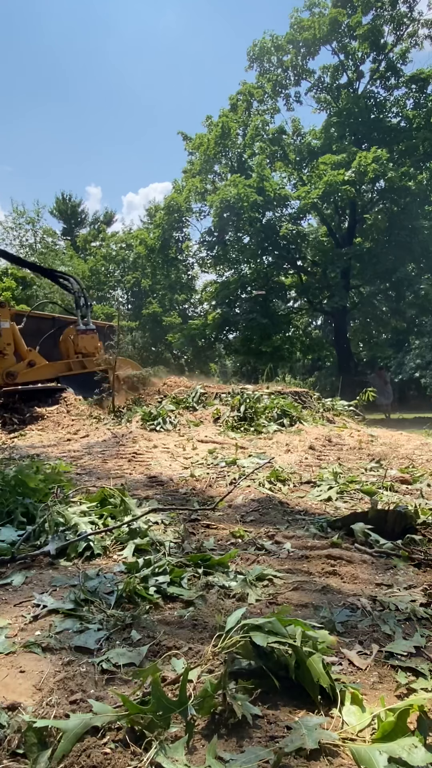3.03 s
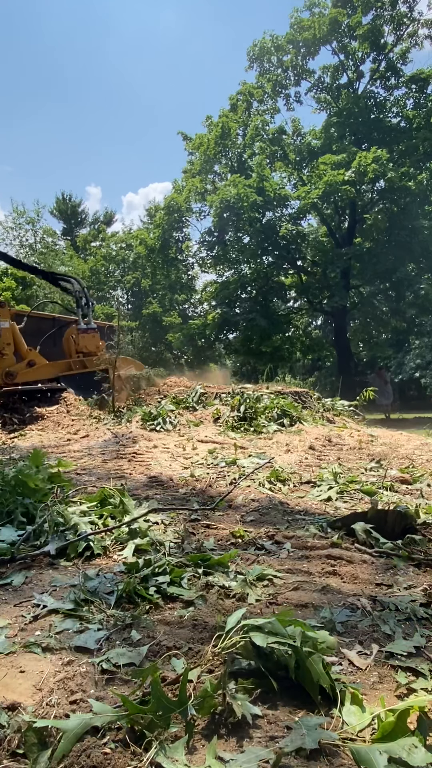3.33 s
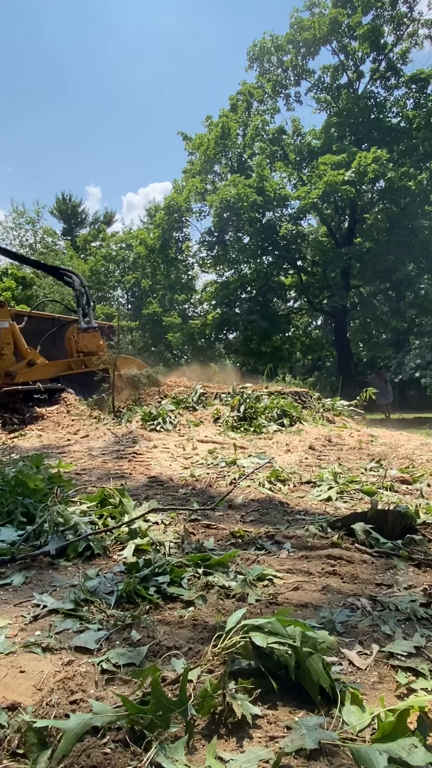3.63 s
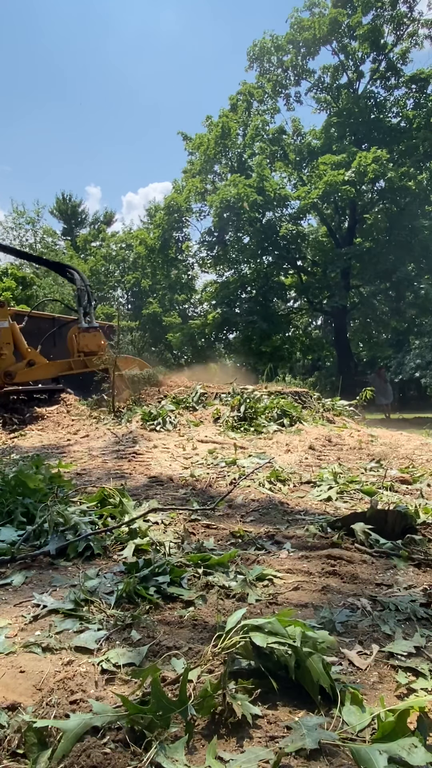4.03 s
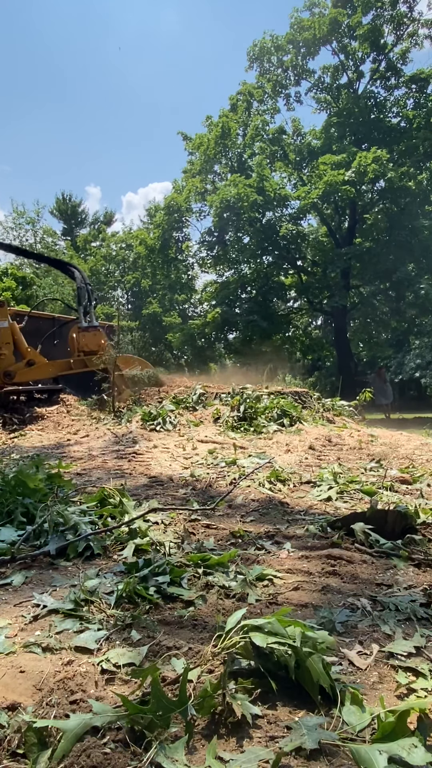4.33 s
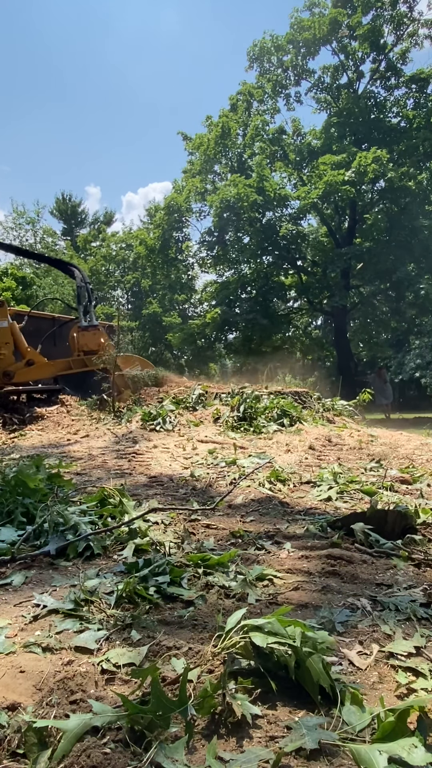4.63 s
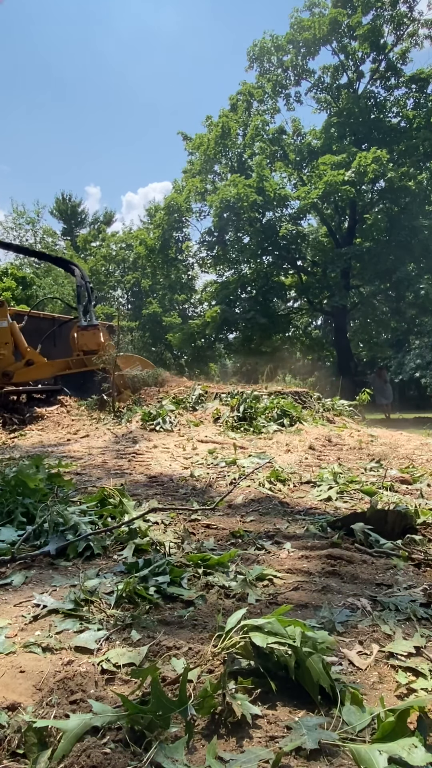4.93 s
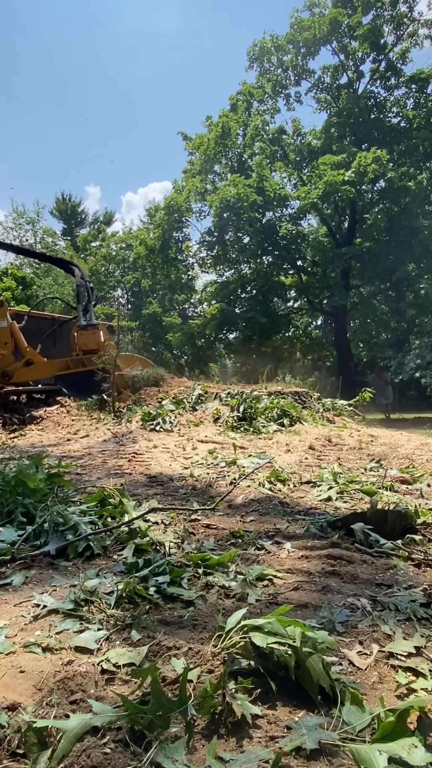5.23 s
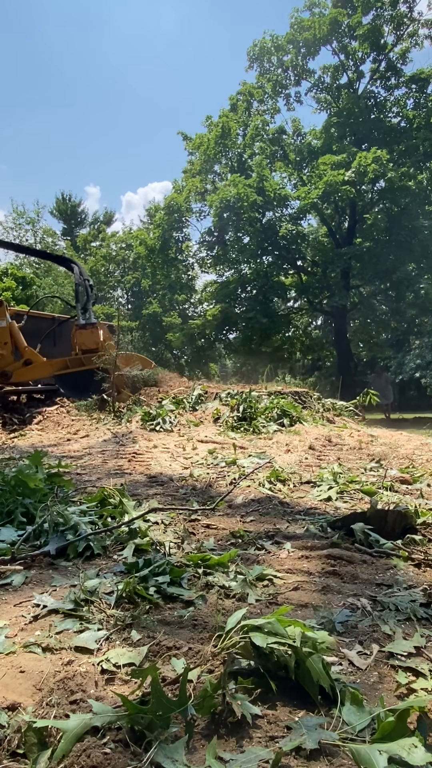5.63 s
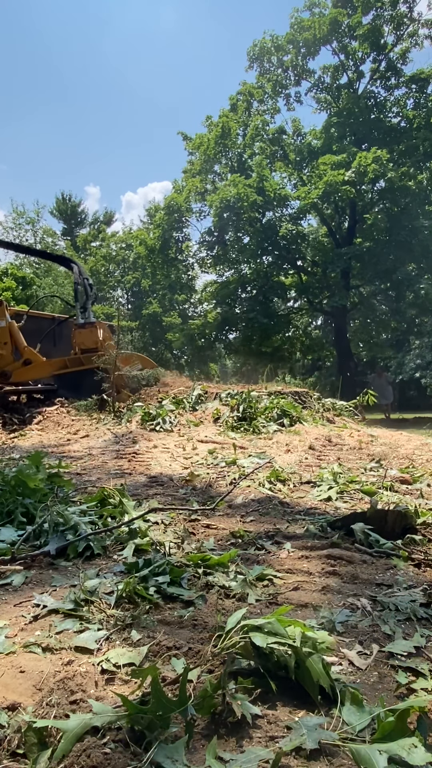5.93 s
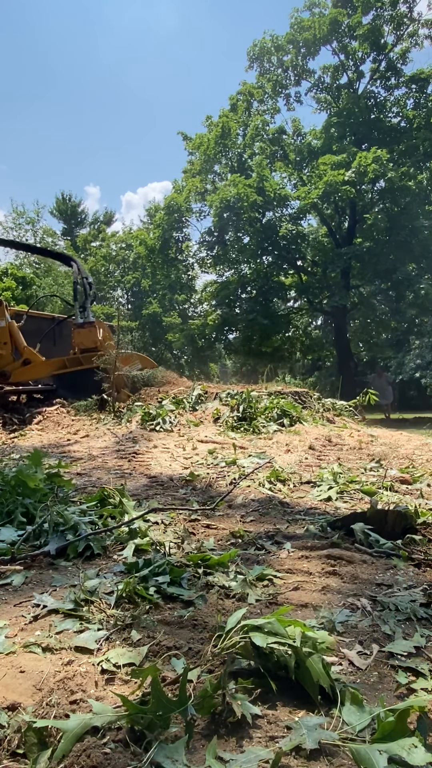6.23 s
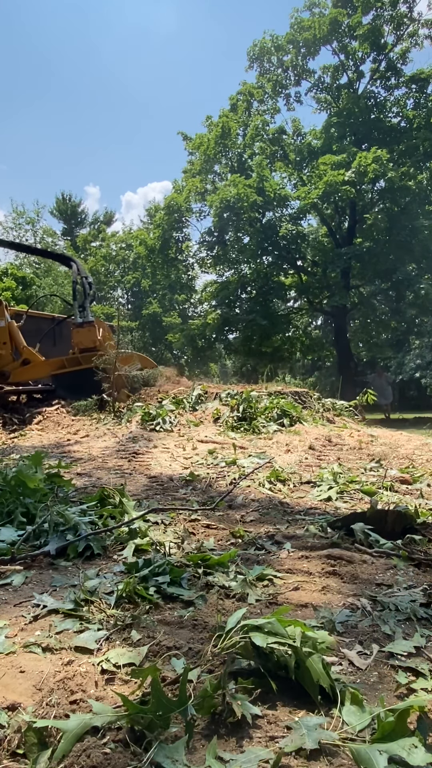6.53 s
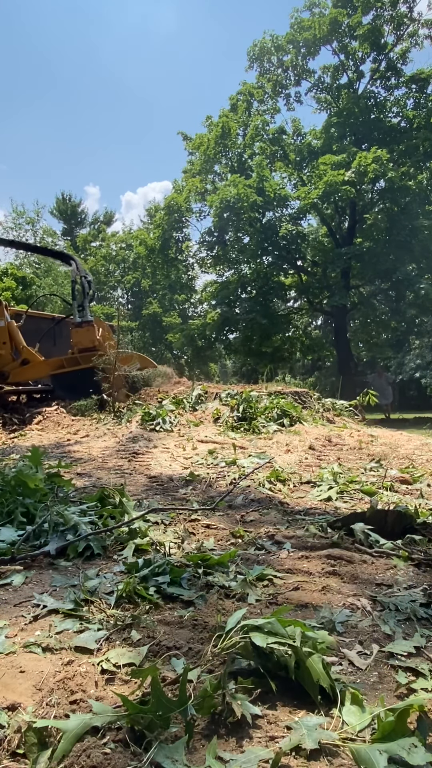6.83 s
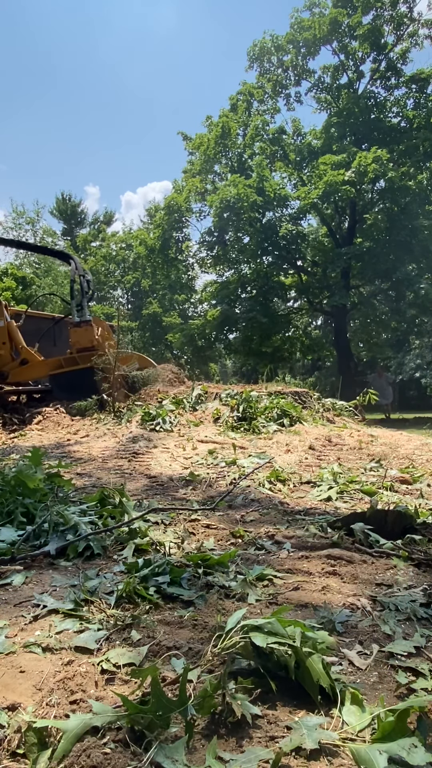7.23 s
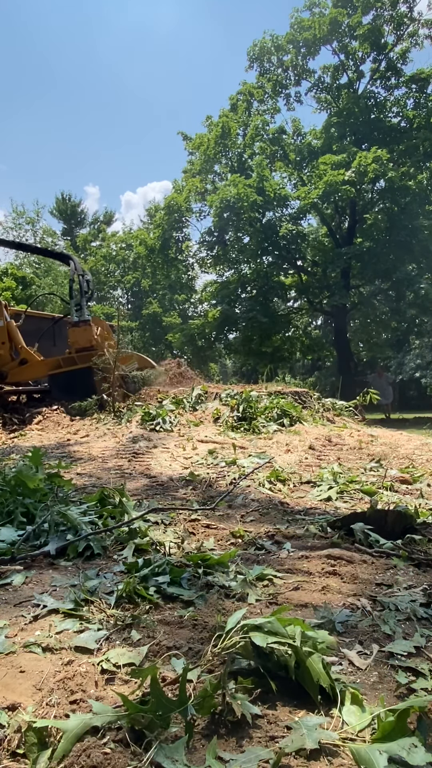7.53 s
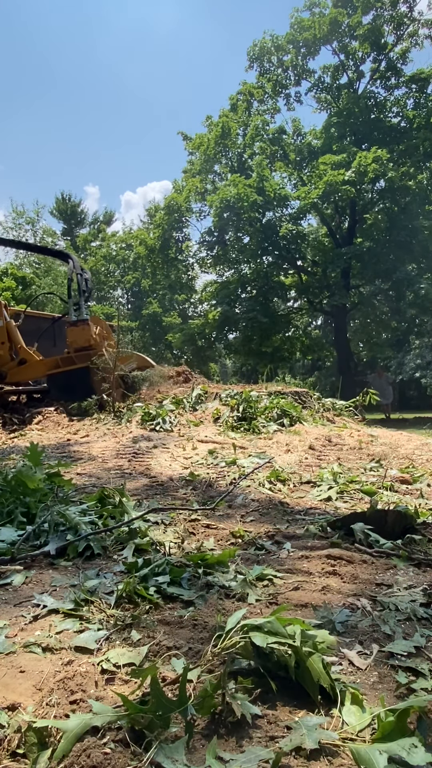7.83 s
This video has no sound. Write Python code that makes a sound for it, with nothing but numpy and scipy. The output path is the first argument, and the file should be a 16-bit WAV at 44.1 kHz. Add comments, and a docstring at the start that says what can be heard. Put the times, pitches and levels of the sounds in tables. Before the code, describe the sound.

Outdoors, at a distance, a stump grinder drones and hisses while chips snap and scatter. The engine rises slightly, then labours and drops in pitch as the cutter wheel hammers into the stump. Uneven knocks, ringing sheet metal and sharp stone pings come with the grinding, and the engine begins to recover at the end. The bass is centred, the hiss and debris spread wide.

```python
"""A stump grinder chews wood some twenty metres off on open ground. Its engine drones on the firing
orders and sags as the cutter wheel bites; teeth hammer the stump, the hood rings, the machine roars
and hisses, and chips and stones crack, tick and ping off it. Behind it sit another machine's hum and
a deep rumble. The bass is centred, the treble wide, and 8.3-11.2 kHz is heard only in the sides."""
import sys
import numpy as np
from scipy import signal
from scipy.fft import rfft, irfft, next_fast_len
from scipy.io import wavfile

SR = 44100
rng = np.random.default_rng(int(sys.argv[2]) if len(sys.argv) > 2 else 0)


def store_wav(level_fs):
    """Save 16-bit WAV to argv[1]."""
    pcm = np.round(np.clip(np.atleast_2d(level_fs), -1, 1) * 32767)
    wavfile.write(sys.argv[1], SR, pcm.T.astype(np.int16))


N = 351918

# Tone colour of the deep bed: f/Hz, level/dB
RUMBLE_EQ = [(20, -1.5), (38, 4), (55, 8.5), (90, -18.5)]
# Partials of the far machine: f/Hz, level/dB
HUM_TONES = [(37.5, -50.5), (74.8, -31.5), (104.5, -47), (149.5, -41.5), (274.5, -40.5)]
# Tone colour of the fan and dust: f/Hz, level/dB
FAN_EQ = [(3000, -9), (5300, 3), (5900, 4), (6400, 4.5), (7600, 3.5), (9000, 0), (11000, -5.5), (13800, -2),
          (14600, -4.5), (15600, -33.5)]
# Tone colour of the cutting hiss: f/Hz, level/dB
CUTTING_EQ = [(700, -1), (1300, 2.5), (1650, 7), (2150, 3), (2450, 3.5), (3000, 3), (3700, 6), (4600, 2.5),
              (4950, 0), (5250, -8), (6200, -8.5), (8000, -17.5)]
# Tone colour of the roar: f/Hz, level/dB
ROAR_EQ = [(25, -43.5), (54, -31), (70, -3.5), (130, 5), (250, 1), (350, 1.5), (600, -2.5), (900, -6.5),
           (1300, -12), (2500, -43.5)]
# Panels and hood ringing in the roar: f/Hz, width/Hz, level/dB against the roar
PANEL_RINGS = [(247.7, 9.9, -16.5), (299.2, 19, -14), (344.6, 43, -18), (550, 26, -23), (577, 26, -24.5),
               (1252.5, 32, -21.5), (1504, 75, -19.5), (1620, 520, -18.5)]
# Small stones off the guard: t/s, level/dB, f/Hz
STONE_PINGS = [(2.615, -26, 3600), (3.5234, -18, 3920), (3.8676, -20, 3700), (4.1274, -21.5, 3560),
               (4.4417, -24, 4060), (4.4725, -13, 3700), (4.8833, -34, 2870), (5.0497, -17.5, 3900),
               (5.5114, -22, 2500), (5.6344, -28, 2520), (5.8102, -34.5, 2730), (6.2147, -29, 3050),
               (6.235, -16.5, 3080), (6.2647, -17, 3850), (6.362, -17, 3850), (6.4494, -15, 3640),
               (6.7461, -31, 3700), (6.7645, -33, 3390), (6.8067, -18, 3800), (7.1082, -21, 2880),
               (7.1826, -32, 3100), (7.3976, -17.5, 3180), (7.772, -21, 3600)]
# Chips and stones off the wheel: t/s, ring level/dB, ring f/Hz, ring t60/s, spray level/dB
CHIP_CRACKS = [(0.866, -26, 3900, .08, -55), (0.879, -16.5, 3430, 0.079, -48),
               (0.892, -22.5, 3000, .08, -55), (0.903, -18.5, 3240, 0.21, -35),
               (0.924, -20.5, 3820, 0.082, -38.5), (0.928, -18.5, 2350, 0.075, -42.5),
               (0.914, -21.5, 3500, .08, -55), (0.943, -24, 4200, 0.1, -45),
               (1.132, -21.5, 3980, 0.14, -38), (1.151, -23.5, 4500, 0.11, -41),
               (1.387, -25, 3900, 0.18, -43), (1.406, -20, 2900, .06, -37), (1.42, -20, 2410, 0.12, -49),
               (1.432, -25, 2900, 0.073, -55), (1.448, -24.5, 2350, 0.11, -54),
               (1.477, -33, 3370, 0.11, -34), (1.861, -27.5, 3230, 0.065, -50),
               (1.896, -28.5, 4560, .05, -53), (2.057, -34.5, 3460, 0.11, -31.5),
               (2.118, -30.5, 4470, .05, -46), (2.12, -20.5, 3150, 0.07, -44.5),
               (2.161, -24, 2570, 0.11, -37), (2.176, -21, 1800, 0.12, -30.5),
               (2.385, -25.5, 3790, .04, -55), (2.69, -29, 3320, 0.086, -30),
               (2.717, -26, 3580, 0.039, -26.5), (6.612, -21.5, 3250, 0.072, -48),
               (7.446, -21, 1650, 0.14, -52), (7.462, -25.5, 1620, .15, -53), (7.62, -50, 2786, .1, -36)]
# Sheet metal rung by the engine cycle: f/Hz, width/Hz, level/dB
SHEET_RINGS = [(301.3, 14, -16.5), (537.9, 15, -16.5), (587.5, 14, -18), (660.5, 18, -20.5)]
# Fader ride on that sheet metal: t/s, level/dB against the roar fader
SHEET_SWELL = [(0, 1), (.5, 2.5), (1.1, -1), (1.5, -4.5), (2.4, -1.5), (2.9, 3), (3.4, -1.5), (4.1, 3),
               (4.6, -1.5), (5.4, 2.5), (6.0, -1.5), (6.4, 2.5), (6.7, -1.5), (7.1, 3.5), (7.5, 1),
               (7.98, 0.5)]
# Short rings of the engine block: f/Hz, width/Hz, level/dB
BLOCK_RINGS = [(1000, 130, -3.5), (1560, 250, -3.5)]
# The engine's ride: t/s, firing f/Hz, effort (drone fader)/dB, third order/dB, upper strong orders' lift/dB
ENGINE_RIDE = [(0.0, 79.95, -21, -34, 3.5), (0.6, 76.95, -20.5, -36, 1), (1.0, 80.03, -20.5, -39, 0),
               (1.2, 83.64, -24, -45, -4), (1.42, 84.96, -29.5, -46, -2.5), (2.15, 86.14, -29.5, -42, 7),
               (2.62, 86.16, -32.5, -41, 4.5), (2.85, 84.18, -23.5, -39, 0), (3.1, 84.03, -23.5, -34, 1),
               (3.4, 83.6, -24.5, -48, -4), (3.68, 83.56, -21.5, -34, -2), (4.0, 79.95, -18.5, -32.5, -1),
               (4.44, 74.2, -19, -33, 1), (4.95, 68.82, -21, -25, -2), (5.35, 69.5, -18.5, -27, 1.5),
               (5.8, 67.8, -21.5, -25.5, 3), (6.14, 64.15, -22.5, -24, -5), (6.5, 60.92, -17.5, -17.5, 1),
               (6.8, 60.37, -19, -23, 1), (7.2, 59.08, -18.5, -22.5, 1), (7.5, 59.9, -18.5, -21, -3),
               (7.98, 64.64, -20, -24, -4)]
# Orders that carry the drone: multiple of firing
LOUD_ORDERS = [1, 2, 4.5, 5]
# How the exhaust colours those orders: f/Hz, level/dB against the effort
EXHAUST_EQ = [(59, -6), (69, -1.5), (85, 0.5), (115, 0.5), (172, 4.5), (270, -28), (300, -14), (345, -7.5),
              (385, -7.5), (415, -14), (430, -9.5)]
# Quieter orders, uneven cylinders: multiple of firing, level/dB against the effort
SOFT_ORDERS = [(.5, -40), (3.5, -28.5), (4, -20), (5.5, -26.5), (6, -19)]
# Faders for the cutting load, trimmed in each layer: t/s, bite/dB, roar/dB, cutting hiss/dB, fan/dB
LOAD_FADERS = [(0.0, -35.5, -24, -33.5, -51), (0.93, -35.5, -22, -33.5, -51.5),
               (1.16, -35, -25, -34.5, -52), (1.5, -39.5, -26.5, -39.5, -54.5),
               (1.86, -44, -26, -38, -60.5), (2.09, -36.5, -24.5, -37, -56), (2.55, -40, -26.5, -38.5, -58),
               (2.8, -36, -22.5, -36.5, -55.5), (3.4, -35.5, -23.5, -35.5, -53),
               (3.82, -28, -22, -33.5, -49.5), (3.96, -16, -18.5, -31, -48.5),
               (4.15, -19.5, -19.5, -29.5, -45.5), (4.3, -20, -21, -30.5, -47.5), (4.7, -20, -19, -31, -48),
               (4.95, -23, -20.5, -32.5, -47.5), (5.4, -21.5, -19, -31.5, -49.5),
               (5.8, -21, -22, -32.5, -52.5), (6.1, -29, -20, -33.5, -49.5), (6.5, -29, -22, -33, -51),
               (6.9, -24.5, -22, -34, -51.5), (7.3, -28, -21.5, -33, -52.5), (7.6, -21, -20.5, -35, -51.5),
               (7.98, -26.5, -20, -31, -48.5)]
# How hard the teeth shake the frame: t/s, level/dB against the bite
FRAME_SHAKE = [(0, -1), (1.5, 2), (2.9, -9), (3.6, -3.5), (4.2, -3), (4.6, 1.5), (4.95, -6), (5.3, -0.5),
               (5.8, 0.5), (6.1, -8), (6.5, -4.5), (7.3, -13.5), (7.6, -3), (7.98, -6)]
# Body of a tooth's thud, frame first, then wood and hood: f/Hz, width/Hz, level/dB
THUD_RINGS = [(104.5, 32, 7.5), (246, 16, -15.5), (330, 57, 2.5), (650, 160, -7.5)]
# Heavy bites into the stump: t/s, peak level/dB
HEAVY_BITES = [(3.787, -15.5), (3.871, -12.5), (3.91, -13), (3.994, -14.5), (4.019, -12), (4.168, -8.5),
               (4.34, -9), (4.473, -7), (4.554, -8), (4.635, -9), (4.714, -9), (4.749, -11), (4.784, -19),
               (4.923, -18), (4.975, -10), (5.071, -3), (5.251, -9), (5.323, -13), (5.412, -4), (5.47, -12),
               (5.504, -4), (5.553, -16), (5.665, -13), (5.733, -10), (5.763, -14.5), (5.814, -9),
               (5.9, -11.5), (6.005, -11), (6.128, -13), (6.168, -11.5), (6.233, -17), (6.426, -17.5),
               (7.043, -16), (7.25, -20), (7.327, -9), (7.472, -12), (7.521, -19), (7.672, -11)]
# Stereo image: f/Hz, side over mid/dB, share of the side tied to the mid, its lead/rad
STEREO_IMAGE = [(40, -45.5, .41, 2.2), (75, -36.5, .8, 4), (140, -32, .8, 2.2), (210, -38.5, .51, -4),
                (410, -20.5, .62, 0), (610, -18.5, .56, 1.3), (800, -6.5, .76, 0.1), (1360, -11.5, .57, 1),
                (1783, -1.5, 0.93, 1.4), (2430, 6, 0.57, 1), (3300, 7.5, 0.7, 2), (4540, 9, .3, 1.8),
                (5090, 9, 0.3, 1.5), (5400, 0, 1, 1.74), (8270, 3.5, 1, 1.5), (8340, 64.5, .05, -4),
                (11180, 63, .05, -4), (11920, 6, 0.55, -1.56), (15550, -3, .46, -1.5)]

TEETH_PER_FIRING = 1.535


def from_db(db):
    """Decibels to gain."""
    return np.exp(np.asarray(db) * (np.log(10) / 20))


def rms_one(x):
    """Scale to rms 1."""
    return x / np.sqrt(np.mean(x ** 2) + 1e-20)


def in_time(rows):
    """Automation curves, one value per sample."""
    s, *columns = np.transpose(rows)
    return [np.interp(np.arange(N) / SR, s, c) for c in columns]


def at_hz(points, hz):
    """Columns of a table read on a log-frequency axis."""
    at, *columns = np.transpose(points)
    return [np.interp(np.log(hz), np.log(at), c) for c in columns]


def drift(rate_hz):
    """Slow random wobble of rms 1: coarse noise through a double one-pole low-pass."""
    r = np.exp(-40 * np.pi * rate_hz / SR)
    slow = signal.lfilter([1], [1, -2 * r, r * r], rng.standard_normal(N // 20 + 2002))[2000:]
    return np.interp(np.arange(N) / 20, np.arange(len(slow)), rms_one(slow))


def resonance(x, hz, width_hz):
    """Two-pole peak with gain 1 on top."""
    r = np.exp(-np.pi * width_hz / SR)
    poles = [1, -2 * r * np.cos(2 * np.pi * hz / SR), r * r]
    return signal.lfilter([(1 - r * r) / 2, 0, (r * r - 1) / 2], poles, x)


def steep_ring(x, hz, width_hz):
    """Two matching peaks in series, for steeper skirts."""
    return resonance(resonance(x, hz, width_hz), hz, width_hz)


def coloured(pair, eq):
    """Shape a pair of signals with an EQ curve; rms 1."""
    size = next_fast_len(N)
    hz = np.maximum(np.arange(size // 2 + 1) * SR / size, 1)
    return rms_one(irfft(rfft(pair, size) * from_db(at_hz(eq, hz)[0]), size)[:, :N])


def rumble(level_db=-50.5):
    """A steady bed of deep noise."""
    return from_db(level_db) * coloured(rng.standard_normal((2, N)), RUMBLE_EQ)


def far_hum():
    """Another machine further off holds a few gently wavering tones."""
    out, t = 0, np.arange(N) / SR
    for hz, db in HUM_TONES:
        gain = np.sqrt(2) * from_db(db + drift(0.64))
        out += gain * np.sin(2 * np.pi * (hz * t + rng.random()) + 0.19 * drift(3.2))
    return out


def hiss(firings, level_db, eq, puff, flicker_db):
    """Fan or cutting noise that flickers and puffs a little with each firing."""
    swell = (1 + puff * np.cos(2 * np.pi * firings)) * from_db(flicker_db * drift(15))
    return from_db(level_db) * coloured(swell * rng.standard_normal((2, N)), eq)


def grit(level_db, low_hz, high_hz, per_s, cycles, clump_db):
    """Flying chips tick in clumps, each ringing briefly at a pitch of its own."""
    at = np.flatnonzero(rng.random(N) < per_s * from_db(clump_db * drift(6.0)) / SR)
    chance = rng.random((N // 20, 3))[:len(at)]
    hz = low_hz * (high_hz / low_hz) ** ((chance[:, :1] + chance[:, 1:2]) / 2)
    size = from_db(3.8 * np.minimum(-np.log(chance[:, 2:] + 1e-9), 3.0))
    steps = np.arange(int(2 * cycles / low_hz * SR))
    age = np.pi * hz / cycles * steps / SR
    ticks = size * age * np.exp(-age) * np.sin(2 * cycles * age)
    out = np.bincount((at[:, None] + steps).ravel(), ticks.ravel(), N + len(steps))[:N]
    return from_db(level_db) * rms_one(np.array([out, np.roll(out, int(0.0099 * SR))]))


def pings(t60_s=.035):
    """Stones ping off the guard: a short ring and a softer overtone, late on the scattered path."""
    out, t = np.zeros(N), np.arange(int(.1 * SR)) / SR
    envelope = from_db(-60 * t / t60_s) * (1 - np.exp(-t / 0.00057))
    for s, db, hz in STONE_PINGS:
        at = int(s * SR)
        ring = np.sin(2 * np.pi * hz * t) + .5 * np.sin(2 * np.pi * hz * 1.2 * t)
        out[at:at + len(t)] += (from_db(db) * envelope * ring)[:N - at]
    return np.array([out, np.roll(out, int(0.0065 * SR))])


def cracks(width_share=0.19, crunch_db=-6, spray_t60_s=0.068):
    """Chips crack off the wheel: a ragged ring and a broad crunch, with two bright sprays on top."""
    out, length = np.zeros((2, N)), int(.2 * SR)
    t = np.arange(length) / SR
    attack = 1 - np.exp(-t / 0.00033)
    spray_envelope = attack * from_db(-60 * t / spray_t60_s)
    broad = signal.butter(4, [2000, 4700], "band", fs=SR, output="sos")
    bright = signal.butter(2, [6000, 9500], "band", fs=SR, output="sos")
    brighter = signal.butter(2, [11500, 15000], "band", fs=SR, output="sos")
    for s, ring_db, hz, t60, spray_db in CHIP_CRACKS:
        at, width_hz = int(s * SR), width_share * hz
        grains = rng.standard_normal((2, length))
        splinters = grains * np.abs(grains)    # spiky texture
        ring = rms_one(resonance(resonance(splinters, hz, width_hz), hz, 2 * width_hz))
        crunch = from_db(crunch_db) * rms_one(signal.sosfilt(broad, splinters[::-1]))
        body = (ring + crunch) * attack * from_db(ring_db - 60 * t / t60)
        spray = rms_one(signal.sosfilt(bright, splinters)) + rms_one(signal.sosfilt(brighter, splinters))
        out[:, at:at + length] += (body + from_db(spray_db) * spray * spray_envelope)[:, :N - at]
    return out


def roar(firings, roar_db):
    """Lumpy, chugging noise of exhaust, wheel and torn wood; shaken panels add wavering rings."""
    # every other firing is stronger
    chug = 1 + 0.17 * np.cos(2 * np.pi * firings) + 0.16 * np.cos(np.pi * firings)
    out = chug * from_db(drift(39)) * coloured(rng.standard_normal((2, N)), ROAR_EQ)
    shake = rng.standard_normal((2, N))
    for hz, width_hz, db in PANEL_RINGS:
        out += from_db(db + 2.5 * drift(3.2)) * rms_one(steep_ring(shake, hz, width_hz))
    return from_db(roar_db - 1.5) * out


def sheet_metal(firings, roar_db):
    """A pulse every second firing holds all the half orders; sheet metal sings those near its rings."""
    pulses = np.diff(np.floor(firings / 2), prepend=0) * from_db(2.1 * drift(21)) + 1e-18
    rings = sum(from_db(db) * rms_one(steep_ring(pulses, hz, width)) for hz, width, db in SHEET_RINGS)
    return from_db(roar_db + in_time(SHEET_SWELL)[0] + 1.2 * drift(2.6)) * rings


def block_raps(firings, firing_hz, spread_db=3.5, loss_db_per_hz=.5):
    """Hard combustion raps the block once a firing, unevenly, and louder at low speed."""
    out, fired = 0, np.diff(np.floor(firings), prepend=0)
    for hz, width_hz, db in BLOCK_RINGS:
        clicks = fired * from_db(spread_db * rng.standard_normal(N)) * rng.choice([-1, 1], N) + 1e-18
        out += from_db(db) * rms_one(steep_ring(clicks, hz, width_hz))
    return from_db(-35.5 - loss_db_per_hz * (firing_hz - 66)) * out


def engine(firings, firing_hz, effort_db, third_db, lift_db, bite_db, frame_db):
    """The drone: each order is a sine locked to the crank, wavering in level and phase."""
    smother_db = 0.25 * np.maximum(bite_db + 41, 0)    # a hard bite ducks the upper strong orders
    orders = [(k, effort_db + at_hz(EXHAUST_EQ, k * firing_hz)[0] + (lift_db - smother_db) * (k > 3))
              for k in LOUD_ORDERS]
    orders += [(3, third_db), (2.8, bite_db + frame_db - 4.5)]    # 2.8 labours as the frame shakes
    orders += [(k, effort_db + db) for k, db in SOFT_ORDERS]
    out = 0
    for k, db in orders:
        phase = 2 * np.pi * (k * firings + rng.random()) + 0.06 * np.sqrt(k) * drift(5.5)
        waver_db = 0.55 * drift(25) + (drift(3.3) if k > 2 else 0)
        out += np.sqrt(2) * from_db(db + waver_db) * np.sin(phase)
    return out


def hood_growl(firings, bite_db, hood_hz=245.2, width_hz=22):
    """A tone at twice the tooth rate growls where it meets a ring of the hood."""
    gain = from_db(bite_db + 0.5 + 6.2 * drift(15))
    tone = gain * np.sin(4 * np.pi * TEETH_PER_FIRING * firings + drift(9))
    return steep_ring(tone, hood_hz, width_hz)


def struck(blows, rings):
    """Each ring's answer to the blows, in alternating polarity."""
    return [from_db(db) * resonance(blows, hz, width) * (-1) ** k
            for k, (hz, width, db) in enumerate(rings)]


def knocks(contact_s=.002):
    """A heavy bite lands as one thud in the wood and hood."""
    click, blows = np.zeros(SR // 8), np.zeros(N)
    contact = np.hanning(int(contact_s * SR))
    click[:len(contact)] = contact
    thud = sum(struck(click, THUD_RINGS[1:]))
    for s, peak_db in HEAVY_BITES:
        blows[int(s * SR)] = from_db(peak_db)
    return signal.fftconvolve(blows, thud / np.abs(thud).max())[:N]


def teeth(firings, bite_db, frame_db, jitter_s=.0004, spread_db=5.0):
    """The wheel hammers the stump: every tooth hits with its own strength, a little early or late."""
    on_beat = np.flatnonzero(np.diff(np.floor(TEETH_PER_FIRING * firings)))
    timing, strength = rng.standard_normal((len(on_beat), 2)).T
    at = np.clip(on_beat + (jitter_s * SR * timing).astype(int), 0, N - 1)
    blows = np.zeros(N)
    blows[at] = from_db(spread_db * np.clip(strength, -3, 1.3))
    frame, *wood_and_hood = struck(blows, THUD_RINGS)
    body = sum(wood_and_hood)
    return from_db(bite_db + 0.5) * (from_db(frame_db) * frame + body) / np.std(frame + body)


def stereo_spread(pair):
    """Spread a direct and a scattered path over mid and side: bass centred, treble wide."""
    size = next_fast_len(N)
    side_db, tied, lead = at_hz(STEREO_IMAGE, np.maximum(np.arange(size // 2 + 1) * SR / size, 1))
    direct, scattered = rfft(pair, size)
    total = np.sqrt(1 + from_db(side_db) ** 2)
    mid = irfft(direct / total, size)[:N]
    blend = tied * np.exp(1j * lead) * direct + np.sqrt(1 - tied ** 2) * scattered
    side = irfft(blend * from_db(side_db) / total, size)[:N]
    return np.array([mid + side, mid - side])


def scene():
    """Mix the grinder, its debris and the background, and spread them in stereo."""
    firing_hz, effort_db, third_db, lift_db = in_time(ENGINE_RIDE)
    bite_db, roar_db, cutting_db, fan_db = in_time(LOAD_FADERS)
    frame_db, = in_time(FRAME_SHAKE)
    firings = np.cumsum(firing_hz) / SR    # running count: the grinder's clock
    drone = engine(firings, firing_hz, effort_db, third_db, lift_db, bite_db, frame_db)
    drone += teeth(firings, bite_db, frame_db) + hood_growl(firings, bite_db) + knocks()
    drone += sheet_metal(firings, roar_db) + block_raps(firings, firing_hz) + far_hum()
    slapback = np.roll(drone, int(0.049 * SR))    # off the trees
    cutting = hiss(firings, cutting_db + 6, CUTTING_EQ, puff=.08, flicker_db=.25)
    fan = hiss(firings, fan_db + 13.5, FAN_EQ, puff=0.057, flicker_db=2.0)
    chips = grit(cutting_db - 0.5, low_hz=2400, high_hz=4712, per_s=240, cycles=61, clump_db=4.0)
    chips += grit(fan_db + 7, low_hz=5900, high_hz=14500, per_s=700, cycles=14, clump_db=4.5)
    wash = rumble() + roar(firings, roar_db) + cutting + fan
    return stereo_spread(np.array([drone, slapback]) + wash + chips + cracks() + pings())


def record(dry):
    """Soft-clip the peaks, then cut the top steeply."""
    high_cut = signal.ellip(16, 1, 80, 15790, fs=SR, output="sos")
    return signal.sosfilt(high_cut, 1.3 * np.tanh(dry / 1.3))


dry = scene()
out = record(dry)
store_wav(out)
```